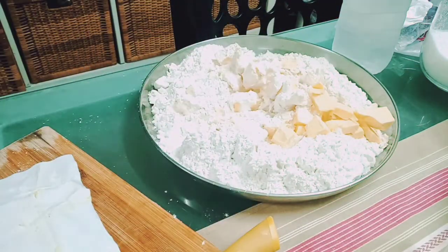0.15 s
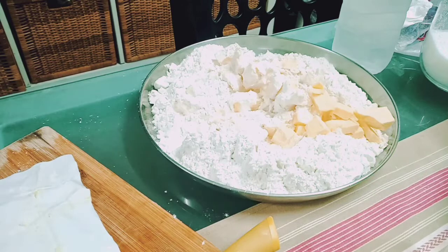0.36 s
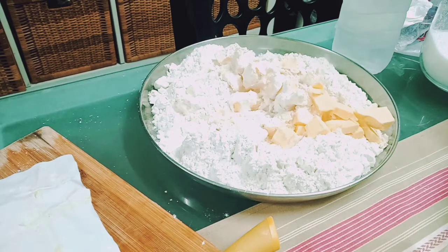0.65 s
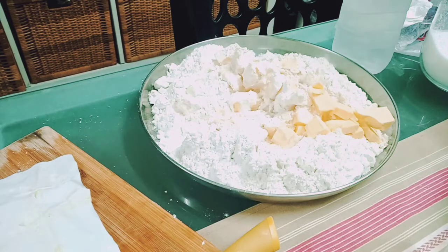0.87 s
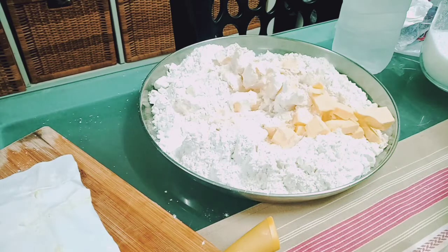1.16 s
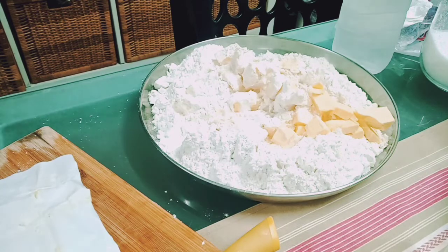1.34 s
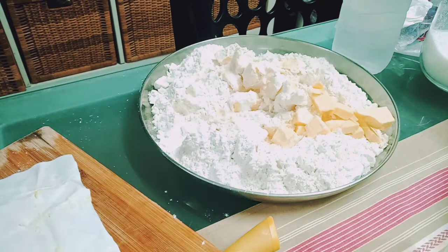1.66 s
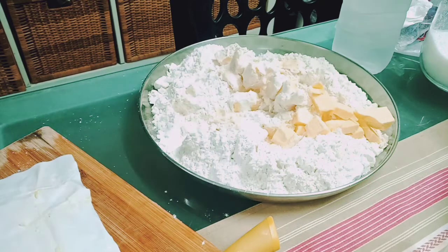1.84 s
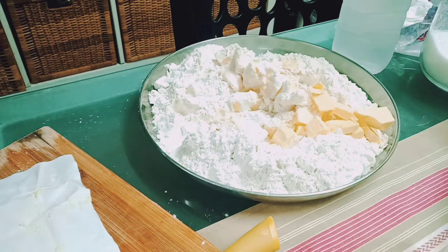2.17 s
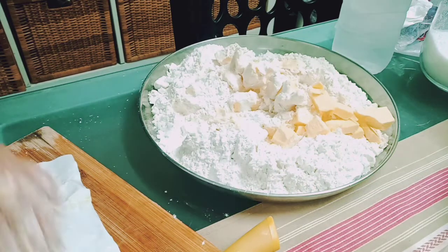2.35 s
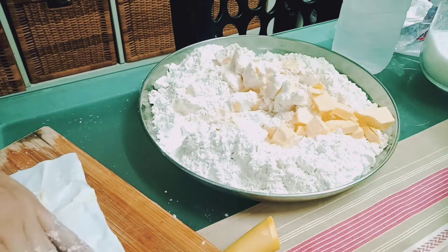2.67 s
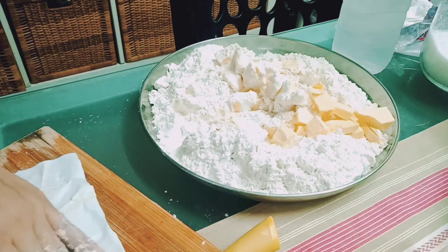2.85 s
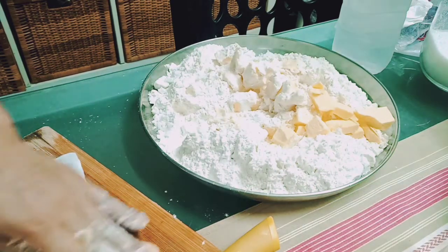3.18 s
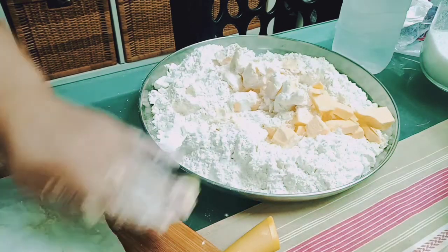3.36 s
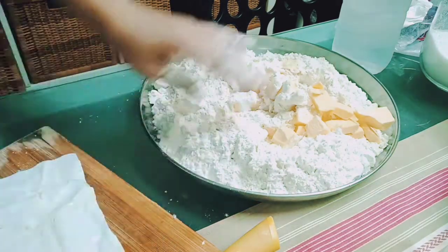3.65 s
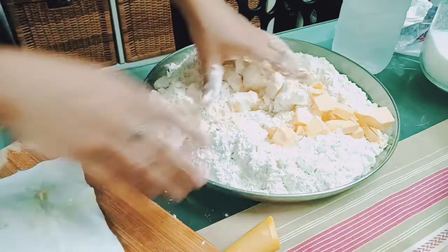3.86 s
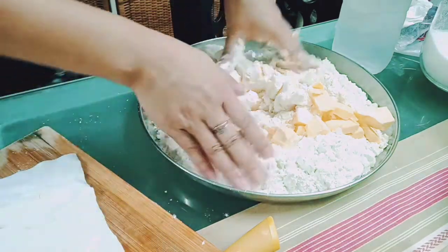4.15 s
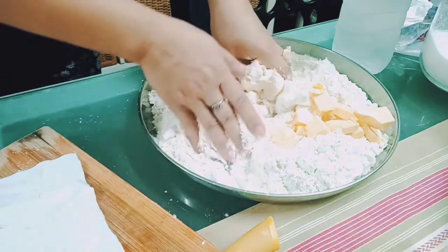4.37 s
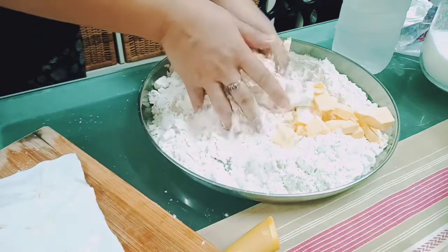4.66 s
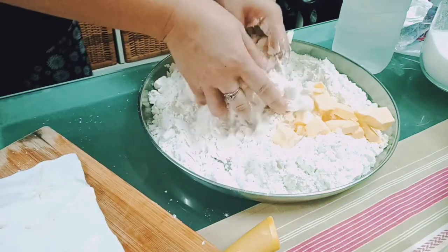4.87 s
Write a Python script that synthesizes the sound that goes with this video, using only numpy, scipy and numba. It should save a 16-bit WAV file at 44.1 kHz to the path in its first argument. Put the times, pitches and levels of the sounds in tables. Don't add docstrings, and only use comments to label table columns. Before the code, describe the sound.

Quiet kitchen hum and hiss, then dry powdery rubbing, snapping crumbs, a short breathy skin squeak and dull counter bumps, heard close.

```python
import sys
import numpy as np
from scipy import signal
from scipy.fft import rfft, irfft, next_fast_len
from scipy.io import wavfile
from scipy.ndimage import uniform_filter1d
from numba import njit

SR = 44100
rng = np.random.default_rng(int(sys.argv[2]) if len(sys.argv) > 2 else 0)


def how_loud(loudness_db):
    steps = np.asarray(loudness_db, float) / 20
    return 10 ** steps


def wav_out(sig):
    wavfile.write(sys.argv[1], SR, np.round(np.clip(np.atleast_2d(sig).T, -1, 1) * 32767).astype(np.int16))


N = 221104

# (time [s], hold [s], level [dB], fine dust [dB], broad palm [dB])
WIPES = [(.001, 0.0018, -60, -19, -3), (.705, 0.014, -55, -11, 0.5), (.94, 0.0044, -49.5, -26, -2),
         (2.978, 0.004, -46.5, -11, -4), (1.478, 0.076, -30, -8, -2), (1.6, 0.0096, -32.5, -10.5, -0.5),
         (2.02, 0.04, -32, -10.5, -7.5), (2.09, 0.022, -40, -14, -2), (2.78, 0.014, -58.5, -3.5, -7),
         (3.1, 0.13, -41, -9.5, -8.5), (3.235, 0.032, -45, -11, -21), (3.32, 0.049, -44.5, -12.5, -5.5),
         (3.44, 0.072, -48, -18, 4.5), (3.57, 0.035, -49.5, -14, 4.5), (3.69, 0.0054, -48, -18.5, -3.5),
         (3.92, 0.057, -58.5, -13, 3.5), (4.025, 0.13, -44, -16.5, -2), (4.17, 0.12, -43.5, -13, -4.5),
         (4.3, 0.07, -40, -13.5, -1), (4.812, 0.19, -59, -17.5, 1), (4.99, 0.025, -56, -18, -2)]
PATS = [(0.205, 0.026, -62.5, -10, -1), (0.363, 0.027, -42, -16, -2.5), (0.4156, 0.016, -35.5, -1.5, -1.5),
        (.956, 0.0017, -34.5, -7.5, -9.5), (1.386, 0.11, -36.5, -6.5, -4.5), (1.42, 0.029, -32.5, -2, -1.5),
        (1.94, 0.082, -38.5, -4, 2), (1.916, 0.0087, -29, -7.5, -7), (2.436, 0.0065, -41.5, -22, 1.5),
        (2.562, .004, -53, -28, 3), (2.995, 0.066, -41, -11, -1.5), (2.863, .002, -68, -20, 10),
        (.9125, .004, -62, -20, 2), ]
FIDGETS = [(.29, 0.031, -67, -13, -20), (.552, 0.016, -64.5, -14, 0), (.76, 0.034, -60.5, -14, 6),
           (.88, .03, -82, -20, 10), (1.03, 0.014, -61, -27, -4), (1.148, 0.0092, -64.5, -12, 2),
           (1.7, 0.0096, -58, -20, -1), (2.19, 0.24, -66.5, -20, 2), (2.388, 0.022, -49.5, -12.5, -0.5),
           (2.5, 0.025, -64, -14, 3), (2.648, 0.0088, -49.5, -18, 5.5), (2.88, 0.13, -73, -1, -12),
           (3.766, 0.0022, -46.5, -14, 1), (3.86, 0.055, -69, -14, -10), (4.46, 0.08, -65, -17, 1),
           (4.65, .13, -72.5, -9, 0.5), (4.942, 0.019, -49, -13, -1.5)]
# (level [dB], fine dust [dB], broad palm [dB])
IDLE = (-79.5, -27, 0)
WIPE_RISE_DB_S, WIPE_FALL_DB_S = 365, 304
PAT_RISE_DB_S, PAT_FALL_DB_S = 2605, 366
FIDGET_RISE_DB_S, FIDGET_FALL_DB_S = 700, 325
# (frequency [Hz], density [dB per Hz])
GRAIN_SPECTRUM = [(1000, -13.5), (1460, -9), (1700, -4), (2250, -1.5), (3400, 6.5), (5600, 0), (6700, -8.5),
                  (7900, -13), (8800, -11.5), (13600, -29.5), (14900, -26), (16000, -21)]
# (frequency [Hz], width [Hz], level [dB])
BOWL_MODES = [(1270, 87, 2), (5140, 690, -7.5), (6700, 130, -28)]

# (frequency [Hz], density [dB per Hz])
LOW_HUM = [(100, -19), (125, 4), (160, -4), (190, -10)]
UPPER_HUM = [(160, -8), (215, 6), (260, -2), (320, -5.5), (420, -23.5), (600, -13.5), (1000, -20)]
AIR = [(300, -1), (600, -6.5), (1100, -7), (1500, -14), (2300, -18), (5700, -30.5), (6300, -33),
       (13500, -36.5), (14900, -35.5), (16000, -29)]
AIR_DB, AIR_FOLLOWS = -65.5, 0.15
WHINE_HZ, WHINE_WIDTH_HZ = 1263, 113

# (time [s], low hum [dB], upper hum [dB])
BUMPS = [(0.23, -47.5, -51.5), (0.45, -60, -51), (0.94, -49.5, -53), (1.02, -47.5, -45), (1.5, -54, -45.5),
         (1.62, -46, -51), (1.7, -51, -56), (1.85, -44, -50), (1.95, -38.5, -46.5), (2.07, -52, -52),
         (2.3, -52, -49), (2.43, -64, -50), (2.53, -51, -57), (2.66, -48, -44), (2.77, -41.5, -46.5),
         (2.89, -45.5, -52.5), (3.02, -47, -46), (3.11, -42.5, -48.5), (3.24, -39, -48), (3.42, -41, -46.5),
         (3.6, -44, -50), (3.68, -48.5, -51), (3.83, -71, -53.5), (3.93, -61, -49), (4.06, -44, -46),
         (4.17, -38.5, -49), (4.39, -38, -44), (4.52, -38.5, -46.5), (4.67, -45.5, -54), (4.86, -73, -59.5),
         (.02, -54, -66), (.35, -62, -67), (.6, -53, -67), (.71, -51, -72), (.82, -54, -55),
          (1.15, -61, -53), (1.25, -73, -56.5), (1.39, -57, -62), (2.0, -43, -49), (2.18, -58, -56),
          (2.69, -52, -62), (2.8, -49.5, -53), (3.17, -45, -50.5), (3.329, -45, -46), (3.5, -50.5, -59),
          (4.0, -69, -70), (4.251, -48, -52), (4.545, -51.5, -56), (4.99, -61, -60)]
BUMP_RISE_DB_S, BUMP_FALL_DB_S = 304.5, 361.5
LOW_REST_DB, UPPER_REST_DB, HUM_FOLLOWS = -65, -64, 0.24
# (time [s], level [dB])
FLARES = [(0.11, -51), (0.435, -41), (0.83, -49), (0.95, -45.5), (1.05, -49.5), (1.44, -59), (1.52, -42),
          (1.61, -50), (1.93, -40), (2.06, -43), (2.24, -49), (2.32, -48), (2.45, -45), (2.57, -49),
          (2.65, -43.5), (2.77, -54), (2.86, -47.5), (2.93, -52), (3.01, -62), (3.18, -44), (3.4, -42),
          (3.69, -53), (3.77, -46), (3.92, -46.5), (4.03, -46.5), (4.15, -42.5), (4.3, -39), (4.54, -46.5),
          (4.75, -51), (4.92, -50.5),
          (.378, -48), (.445, -46), (.472, -52), (.52, -56), (1.87, -52), (3.35, -46), (3.43, -48),
           (3.5, -54), (3.58, -47), (4.07, -45), (4.21, -49), (4.325, -46), (4.35, -43), (4.39, -41.5),
           (4.5, -50.5)]
FLARE_RISE_DB_S, FLARE_FALL_DB_S, WHINE_REST_DB, WHINE_FOLLOWS = 293, 288, -59.5, 0.34
# (time [s], hold [s], depth [dB])
SHUTS = [
    (0.154, 0.017, 3.5),
    (3.9, .02, -1.5),
    (3.616, 0.027, -13),
    (4.557, 0.029, -9),
]
SHUT_DB_S, REOPEN_DB_S = 900, 500
GATE_FROM_DB, GATE_LAG_S = -69.5, 0.013
# (time [s], level [dB])
SHIFTS = [(.001, -69), (.45, -64), (.97, -71), (1.47, -54), (1.95, -58.5), (2.33, -64), (2.77, -64),
          (3.26, -56.5), (3.6, -61), (3.92, -60), (4.19, -56), (4.45, -61)]
SHIFT_DB_S, RUMBLE_REST_DB = 90, -72.5

# (time [s], peak [dB], pitch [Hz])
THUDS = [(0.074, -52, 147), (0.202, -43.5, 162.3), (0.315, -50, 132), (0.438, -40, 205),
         (0.58, -48.5, 134.4), (0.697, -53, 151), (0.777, -47, 218), (0.89, -43, 216), (0.934, -44, 144),
         (0.998, -42, 131), (1.086, -49, 124), (1.134, -50, 221), (1.373, -43, 140), (1.607, -37.5, 232),
         (1.682, -45, 138), (1.837, -42, 157.6), (1.887, -41, 140), (1.94, -34, 156), (2.057, -34.5, 193.5),
         (2.176, -44, 242), (2.294, -42, 157), (2.384, -49, 194), (2.519, -45, 138), (2.637, -33.5, 215),
         (2.756, -37, 193), (2.877, -42, 136), (2.992, -40, 151), (3.096, -36.5, 148.6), (3.23, -35.5, 160),
         (3.588, -39.5, 142), (3.663, -47, 124), (3.771, -44.5, 235), (3.818, -50, 218), (3.914, -52, 303),
         (3.915, -39.5, 224), (4.031, -37.5, 185), (4.212, -35, 131), (4.369, -44, 353),
         (4.37, -36.5, 146.5), (4.511, -35, 165), (4.612, -42.5, 206), (4.847, -46.5, 215),
         (4.947, -47.5, 183)]
THUD_DB, THUD_RISE_S, THUD_CYCLES, THUD_SAG = -5.0, 0.0085, 3.03, 0.056
# (time [s], peak [dB])
SNAPS = [(.362, -45), (.4125, -25), (.4185, -29), (.4268, -29), (.9117, -54), (.9510, -33), (1.389, -42),
         (1.914, -40), (2.861, -48), (3.11, -36), (3.757, -46.5), (4.172, -43)]
SNAP_S = 0.00077
# (time [s], hold [s], centre [Hz], level [dB], width share [0-1])
HOLLOWS = [(0.966, 0.045, 3600, -53, 0.56), (1.471, 0.043, 6700, -37, .1), (1.557, 0.0072, 2660, -34, 0.28),
           (1.603, 0.007, 1110, -35, 0.45), (1.918, 0.0076, 1540, -33.5, 1),
           (2.213, 0.13, 1650, -66.5, 0.05), (2.444, 0.007, 1250, -40, 0.05),
           (2.538, 0.086, 5160, -70.5, 0.33), (2.782, 0.032, 5150, -70, 0.02),
           (2.573, 0.0027, 1990, -58, 0.2), (2.66, .025, 427, -57, 0.17), (2.859, 0.019, 414, -56, 0.02),
           (3.335, 0.13, 410, -58.5, 0.18), (1.99, 0.032, 620, -52, 0.26), (1.93, .015, 900, -48, .3),
           (1.39, .02, 390, -56.5, 0.5), (4.04, 0.057, 1460, -47.5, 0.18), (1.679, .08, 1950, -69, .08),
           (2.391, 0.027, 770, -62, 0.03), (2.664, 0.046, 690, -60.5, 0.06),
           (3.019, 0.046, 9800, -58, 0.14), (3.178, .02, 3700, -50, .06), (3.11, .015, 4350, -46.5, 0.04),
           (2.9, 0.0069, 9100, -63, 0.05), (3.584, 0.037, 3380, -60, .08), (4.167, 0.011, 8500, -55, 0.3),
           (4.048, 0.028, 6500, -58, 0.3), (0.37, .004, 8700, -58, 0.05), (2.01, 0.045, 2100, -49, 0)]
HOLLOW_ATTACK_S, HOLLOW_RELEASE_S, HOLLOW_EDGE_DB, HOLLOW_SAG = 0.013, 0.053, -38, 0.016
# (time [s], centre [Hz], level [dB])
OPENING = [
    (1.97, 6200, -46),
    (2.0, 5750, -36),
    (2.035, 4360, -33.5),
    (2.07, 3030, -61),
    (2.09, 2060, -36.5),
]
# (time [s], peak [dB], pitch [Hz])
CRACKS = [(0.4125, -32.5, 1360), (0.4125, -29, 5300), (0.4268, -29.5, 5670), (0.9117, -54, 3350),
          (0.9504, -25, 3420), (0.9585, -30, 3820), (1.476, -24, 3240), (1.4867, -21, 6300),
          (1.6064, -34, 2250), (1.913, -34, 1630), (1.9256, -27.5, 1600), (2.431, -36.5, 1980),
          (2.437, -36.5, 3940), (2.4417, -37, 2160), (2.5612, -41.5, 2020), (2.6388, -38, 2320),
          (2.86, -55, 1440), (2.984, -41, 2050), (3.233, -47, 2120), (3.757, -42, 2170)]
# (time [s], pitch [Hz], level [dB], octave [dB])
SQUEAK = [(3.04, 2360, -50, -20), (3.1, 2310, -46, -11), (3.115, 2140, -42, -8), (3.15, 2030, -43.5, -8),
          (3.2, 1920, -46, -2), (3.212, 2190, -42, -12), (3.24, 2190, -41.5, -15), (3.305, 2190, -44, -11),
          (3.335, 1876, -44, -14), (3.45, 1824, -49.5, -11), (3.52, 1890, -52.5, -12),
          (3.56, 1720, -53, -8), (3.615, 1740, -54.5, -10)]
# (time [s], level over the drag [dB])
CATCHES = [(3.118, -0.5), (3.14, 4.5), (3.185, 4.5), (3.22, -3), (3.243, 8), (3.272, -3), (3.296, 4),
           (3.33, 1), (3.39, 3), (3.43, 5), (3.5, 2), (3.6, 2)]
CATCH_DB_S, DRAG_DB = 503, -3.5
# (multiple of pitch, level [dB])
OVERTONES = [(3, -15.5), (4, -21.5), (5, -24.5)]

# (delay [s], level [dB])
NEAR_ECHOES = [(.0023, -34), (.0041, -11.5), (.0067, -11.5), (0.012, -11)]
KITCHEN_T60_S, KITCHEN_DB = 0.14, -18
# (frequency [Hz], density [dB per Hz])
SIDE_NOISE = [(40, -25), (300, -12), (1400, -10), (2000, -11), (5700, -15), (6500, -21), (16000, -21.5)]
HANDS_SIDE_DB, BACKGROUND_SIDE_DB, SIDE_NOISE_DB = -60, -34, -76.5
# (frequency [Hz], width [Hz], depth [0-1])
MIC_DIPS = [(6200, 160, 1), (7970, 440, 0.47)]


def at_hz(points, hz):
    point_hz, db = np.transpose(points)
    return np.interp(np.log(hz), np.log(point_hz), db)


def rms_one(x):
    return x / np.sqrt(np.mean(x ** 2) + 1e-20)


def drift(rate):
    r = np.exp(-80 * np.pi * rate / SR)
    slow = signal.lfilter([1], [1, -2 * r, r * r], rng.standard_normal(N // 40 + 2002))[2000:]
    return np.interp(np.arange(N) / 40, np.arange(len(slow)), rms_one(slow))


def bandpass(low_hz, high_hz):
    return signal.butter(2, [low_hz, high_hz], "band", fs=SR, output="sos")


def band(x, low_hz, high_hz):
    return rms_one(signal.sosfilt(bandpass(low_hz, high_hz), x))


@njit
def resonate(x, hz, width_hz, sr):
    y, r = np.zeros(len(x)), np.exp(-np.pi * width_hz / sr)
    for i in range(2, len(x)):
        driven = (1 - r * r) / 2 * (x[i] - x[i - 2])
        y[i] = driven + 2 * r * np.cos(2 * np.pi * hz[i] / sr) * y[i - 1] - r * r * y[i - 2]
    return y


def resonate_at(x, hz, width_hz):
    return resonate(x, np.full(N, float(hz)), float(width_hz), SR)


def even(x, window_s, share):
    power = np.abs(uniform_filter1d(x ** 2, int(window_s * SR)))
    return rms_one(x / (power + .02 * np.mean(x ** 2) + 1e-20) ** (share / 2))


def coloured(spectrum, edges, patchy_db, rate):
    white, out = rng.standard_normal((2, N)), 0
    for k, (low, high) in enumerate(zip(edges, edges[1:])):
        gain_db = at_hz(spectrum, np.sqrt(low * high)) + 10 * np.log10(high - low)
        out = out + how_loud(gain_db + patchy_db * drift(rate)) * band(white[k % 2], low, high)
    return rms_one(out)


def swell(start_s, hold_s, rise_db_s, fall_db_s):
    t = np.arange(0, N, 32)[None] / SR - np.asarray(start_s)[:, None]
    after = np.maximum(t - np.asarray(hold_s)[:, None], 0)
    db = np.minimum(t, 0) * rise_db_s - after * fall_db_s
    return how_loud(2 * np.maximum(db, -150))


def full_rate(x):
    return np.interp(np.arange(N), np.arange(len(x)) * 32, x)


def pile_db(rows, rest_db, rise_db_s, fall_db_s):
    s, *levels = np.transpose(rows)
    shape = swell(s, 0 * s, rise_db_s, fall_db_s)
    return [10 * np.log10(how_loud(2 * rest) + full_rate(how_loud(2 * db) @ shape))
            for db, rest in zip(levels, rest_db)]


def motion():
    power = how_loud(2 * IDLE[0])
    dust, palm = power * IDLE[1], power * IDLE[2]
    for rows, rise, fall in [(PATS, PAT_RISE_DB_S, PAT_FALL_DB_S), (WIPES, WIPE_RISE_DB_S, WIPE_FALL_DB_S),
                             (FIDGETS, FIDGET_RISE_DB_S, FIDGET_FALL_DB_S)]:
        s, hold_s, level_db, dust_db, palm_db = np.transpose(rows)
        strokes = how_loud(2 * level_db)[:, None] * swell(s, hold_s, rise, fall)
        power = power + strokes.sum(axis=0)
        dust = dust + dust_db @ strokes
        palm = palm + palm_db @ strokes
    return full_rate(10 * np.log10(power)), full_rate(dust / power), full_rate(palm / power)


def gate():
    opening = uniform_filter1d(np.maximum(motion()[0] - GATE_FROM_DB, 0), int(GATE_LAG_S * SR))
    hum_rest = [LOW_REST_DB + HUM_FOLLOWS * opening, UPPER_REST_DB + HUM_FOLLOWS * opening]
    whine_rest = [WHINE_REST_DB + WHINE_FOLLOWS * opening]
    low_db, upper_db = pile_db(BUMPS, hum_rest, BUMP_RISE_DB_S, BUMP_FALL_DB_S)
    whine_db, = pile_db(FLARES, whine_rest, FLARE_RISE_DB_S, FLARE_FALL_DB_S)
    s, hold_s, depth_db = np.transpose(SHUTS)
    shut_db = full_rate(depth_db @ swell(s, hold_s, SHUT_DB_S, REOPEN_DB_S))
    return low_db + shut_db, upper_db + shut_db, whine_db + shut_db


def appliance():
    low_db, upper_db, whine_db = gate()
    low = coloured(LOW_HUM, np.geomspace(92, 200, 6), patchy_db=-0.5, rate=27.0)
    upper = coloured(UPPER_HUM, np.geomspace(150, 1100, 13), patchy_db=4.5, rate=10.3)
    hum = how_loud(low_db - 2.0) * even(low, window_s=0.059, share=0.98)
    hum = hum + how_loud(upper_db - 0.5) * even(upper, window_s=0.039, share=0.7)
    rumble_db = pile_db(SHIFTS, [RUMBLE_REST_DB], SHIFT_DB_S, SHIFT_DB_S)[0]
    rumble = how_loud(rumble_db) * band(rng.standard_normal(N), 51.4, 114.0)
    centre = WHINE_HZ + 37.4 * drift(8.9)
    whine = resonate(rng.standard_normal(N), centre, WHINE_WIDTH_HZ * 1.26, SR)
    whine = even(resonate(whine, centre, WHINE_WIDTH_HZ * 1.06, SR), window_s=0.074, share=0.48)
    whine = how_loud(whine_db - 6.0 + 1.9 * drift(14.0)) * whine
    hiss = coloured(AIR, np.geomspace(300, 16400, 20), patchy_db=2.0, rate=21.0)
    return hum + rumble + whine + how_loud(AIR_DB + AIR_FOLLOWS * (whine_db + 81)) * hiss


def grains(per_s):
    signs = rng.choice([-1, 1], (2, N))
    clicks = signs * (rng.random((2, N)) < per_s / SR)
    return rms_one(clicks) + rng.standard_normal((2, N))


def rubbing():
    level_db, dust_db, palm_db = motion()
    stream, edges = grains(per_s=6000), np.geomspace(1000, 16400, 36)
    out, power, clumps = 0, 0, 1.1 * drift(45.)
    for k, (low, high) in enumerate(zip(edges, edges[1:])):
        hz = np.sqrt(low * high)
        top = np.clip(np.log2(hz / 5200) / .5, 0, 1)
        bottom = np.clip(np.log2(3600 / hz) / 0.66, 0, 1.3)
        gain_db = at_hz(GRAIN_SPECTRUM, hz) + top * (dust_db + 19.5) + bottom * (palm_db + 9.5)
        gain = how_loud(gain_db) * np.sqrt(high - low)
        power = power + gain ** 2 * (hz > 1500)
        flicker_db = 2.0 * drift(23.0) + 1.53 * drift(2.9) + clumps
        out = out + gain * how_loud(flicker_db) * band(stream[k % 2], low, high)
    return how_loud(level_db - 3.0) * out / np.sqrt(power)


def bowl(x):
    return x + sum(how_loud(db) * resonate_at(x, hz, width) / 2 for hz, width, db in BOWL_MODES)


def counter_body():
    level_db, (low_db, _, whine_db) = motion()[0], gate()
    spectrum = [(550, -12.0), (800, 0.5), (1100, -6.0), (1500, -5.5)]   # (Hz, dB per Hz)
    dull = coloured(spectrum, np.geomspace(520, 1550, 8), patchy_db=4.0, rate=15.3)
    return how_loud(0.41 * level_db + 0.35 * whine_db + .2 * low_db - 13.5) * dull


def thuds():
    out, t = np.zeros(N + 4000), np.arange(4000) / SR
    for (s, peak_db, hz), turn in zip(THUDS, rng.random((len(THUDS), 1))):
        shape = (1 - np.exp(-(t / THUD_RISE_S) ** 2)) * np.exp(-(t * hz / THUD_CYCLES / 2) ** 2)
        cycles = turn + hz * t * (1 - THUD_SAG * t / 0.051)
        out[round(s * SR):][:4000] += how_loud(peak_db + THUD_DB) * shape * np.sin(2 * np.pi * cycles)
    return out[:N] * how_loud(2.5 * drift(40.0))


def snaps():
    out, t = np.zeros(N + 400), np.arange(400) / SR
    noise = signal.lfilter([1, -.3], [1], rng.choice([-1., 1.], (len(SNAPS), 400)))
    for (s, peak_db), burst in zip(SNAPS, noise):
        out[round(s * SR):][:400] += how_loud(peak_db - 10) * burst * np.exp(-t / SNAP_S)
    return out[:N]


def stroke_layer(rows, width_hz, flutter_db, multiple=1):
    first, last = rows[0][0], rows[-1][0]
    start = int((first - .1) * SR)
    span = slice(max(start, 0), start + int((last - first + .2) * SR))
    t = np.arange(N)[span] / SR
    s, row_hz, row_db = np.transpose(rows)[:3]
    hz, level_db = np.interp(t, s, row_hz), np.interp(t, s, row_db)
    fade = np.interp(t, [first - .006, first, last, last + 0.007], [0, 1, 1, 0])
    once = resonate(rng.standard_normal(len(hz)), hz * multiple, width_hz, SR)
    twice = even(resonate(once, hz * multiple, width_hz, SR), window_s=.012, share=0.4)
    out = np.zeros(N)
    out[span] = fade * how_loud(level_db + flutter_db * drift(36.0)[span]) * twice
    return out


def cupped_palm():
    out = stroke_layer(OPENING, width_hz=1200.0, flutter_db=0.0)
    for s, hold_s, hz, db, share in HOLLOWS:
        end, edge_db = s + hold_s + 1e-3, db + HOLLOW_EDGE_DB
        rows = [(s - HOLLOW_ATTACK_S, hz, edge_db), (s, hz, db), (end, hz, db),
                (end + HOLLOW_RELEASE_S, hz * (1 - HOLLOW_SAG), edge_db)]
        out = out + stroke_layer(rows, width_hz=max(share, .03) * hz, flutter_db=2.5)
    return out


def cracks():
    out, t = np.zeros(N + 2000), np.arange(2000) / SR
    spray = signal.sosfilt(bandpass(1500., 7000.), rng.standard_normal((len(CRACKS), 2000)))
    for (s, peak_db, hz), noise in zip(CRACKS, spray):
        ring = np.sin(2 * np.pi * hz * t) * (1 - np.exp(-t * hz / 0.087)) * np.exp(-t * hz / 3.3)
        puff = noise * np.exp(-t / 0.0012)
        out[round(s * SR):][:2000] += how_loud(peak_db) * (1.67 * ring + 0.31 * puff)
    return out[:N]


def squeak():
    catch = how_loud(pile_db(CATCHES, [DRAG_DB], CATCH_DB_S, CATCH_DB_S)[0])
    s, _, _, row_octave_db = np.transpose(SQUEAK)
    octave_db = np.interp(np.arange(N) / SR, s, row_octave_db)
    octave = how_loud(octave_db) * stroke_layer(SQUEAK, width_hz=380., flutter_db=1.5, multiple=2)
    upper = sum(how_loud(db) * stroke_layer(SQUEAK, width_hz=350.0, flutter_db=2.0, multiple=k)
                for k, db in OVERTONES)
    core = how_loud(-1.5) * stroke_layer(SQUEAK, width_hz=170., flutter_db=1.0)
    breath = how_loud(-8.0) * stroke_layer(SQUEAK, width_hz=950.0, flutter_db=4.5)
    return catch * (core + octave) + breath + upper


def near_echoes(x):
    n, echoes = np.arange(N), 0
    for lag, db in NEAR_ECHOES:
        moving_lag = lag + 7e-5 * drift(3.26)
        echoes = echoes + how_loud(db) * np.interp(n - SR * moving_lag, n, x, left=0)
    return how_loud(-1.5) * (x + echoes)


def kitchen(x):
    size = next_fast_len(N + SR)
    hz = np.arange(size // 2 + 1) * SR / size
    t60 = KITCHEN_T60_S / (1 + hz / 6000)
    echoes = 0
    for k, lag in enumerate(rng.uniform(0.011, 0.027, 8)):
        turn = how_loud(-60 * lag / t60) * np.exp(-2j * np.pi * hz * lag)
        echoes = echoes + (-1) ** k * turn / (1 - turn)
    return irfft(rfft(x, size) * echoes, size)[:N]


def scene():
    strokes = near_echoes(bowl(rubbing()) + cupped_palm() + squeak() + counter_body())
    hands = strokes + bowl(cracks() + 1e-9 * rng.standard_normal(N)) + snaps()
    background = appliance() + thuds()
    mid = hands + how_loud(KITCHEN_DB) * kitchen(hands) + background
    side_noise = coloured(SIDE_NOISE, np.geomspace(30, 16400, 19), patchy_db=3.5, rate=13.0)
    wide_background = background + 2.5 * resonate_at(background, WHINE_HZ, 300)
    side = how_loud(HANDS_SIDE_DB) * hands + how_loud(BACKGROUND_SIDE_DB + 4.0 * drift(9.0)) * wide_background
    side = np.roll(side, 900) + how_loud(SIDE_NOISE_DB) * side_noise
    return np.array([mid + side, mid - side])


def band_limit(x):
    return signal.sosfilt(signal.butter(12, 16480, fs=SR, output="sos"), x)


def record(dry):
    for hz, width, depth in MIC_DIPS:
        dry = np.array([x - depth * resonate_at(x, hz, width) for x in dry])
    top_cut = signal.ellip(10, .5, 60, 15560, fs=SR, output="sos")
    mix = signal.sosfilt(top_cut, dry) - 2e-4
    return band_limit(mix)


dry = scene()
out = record(dry)
wav_out(out)
```